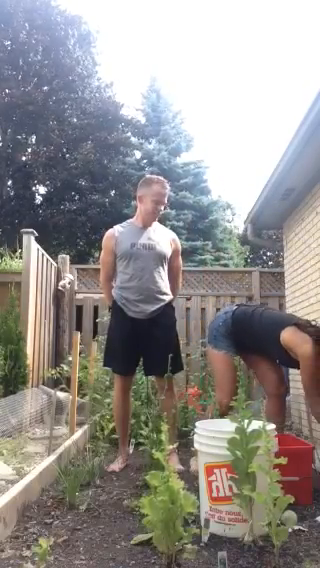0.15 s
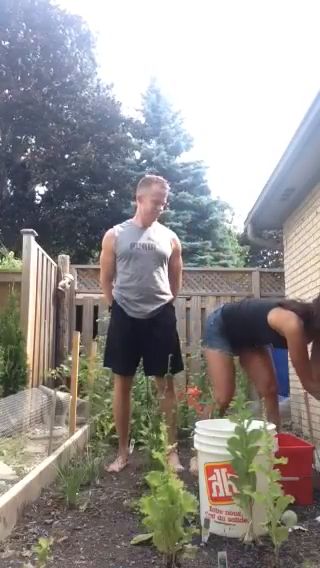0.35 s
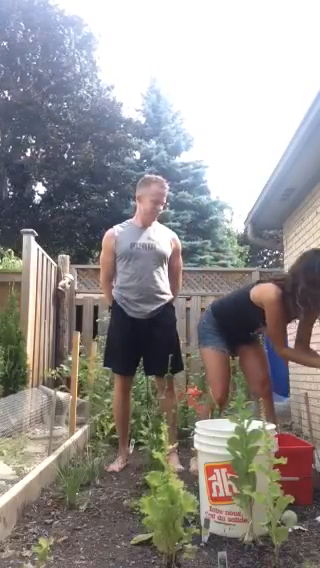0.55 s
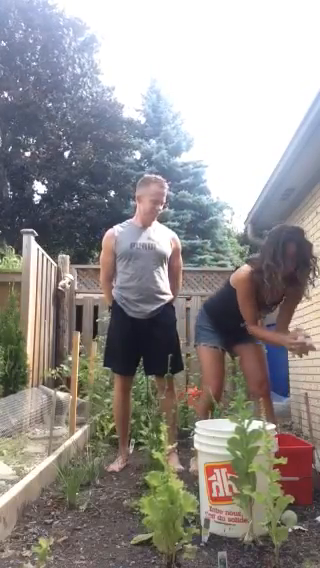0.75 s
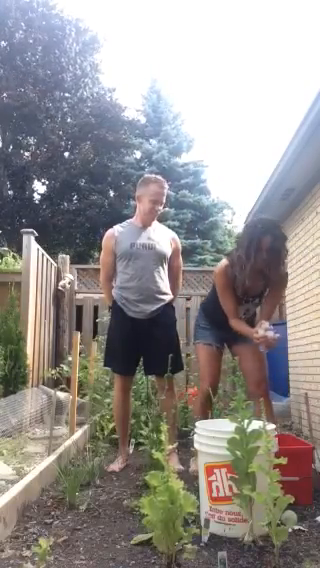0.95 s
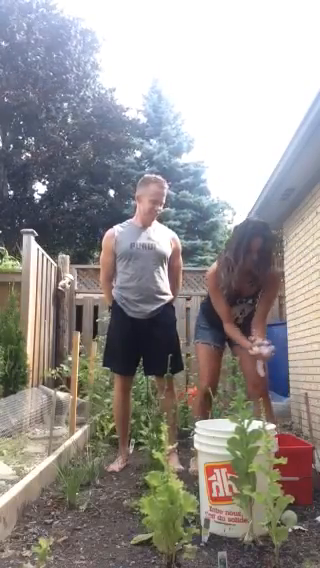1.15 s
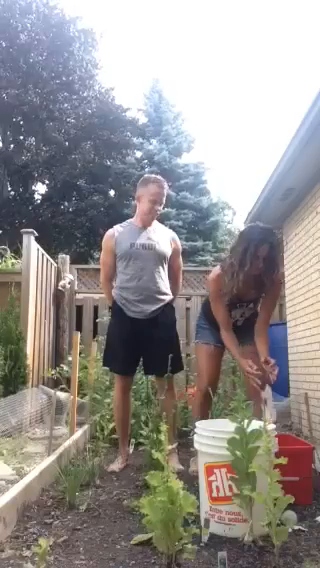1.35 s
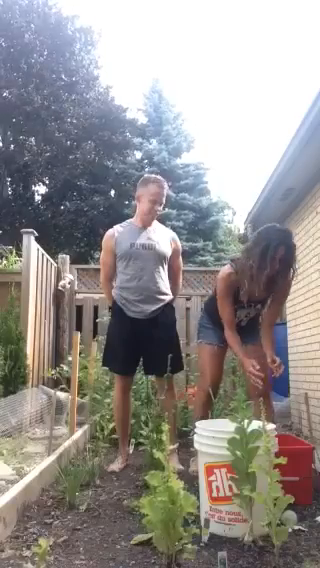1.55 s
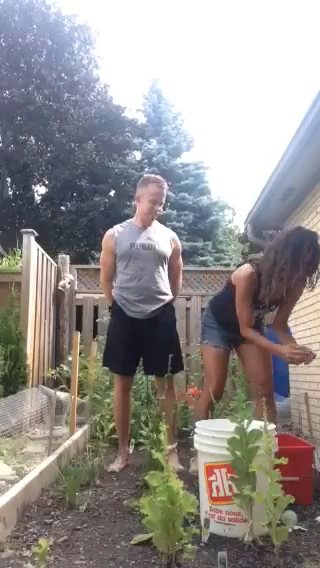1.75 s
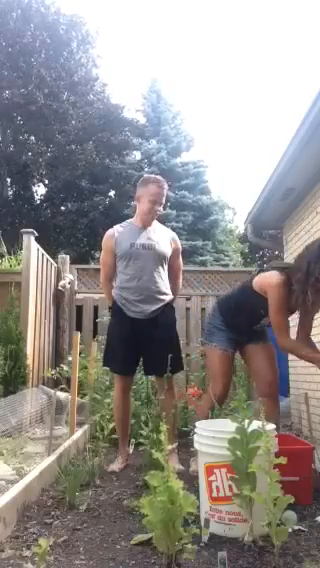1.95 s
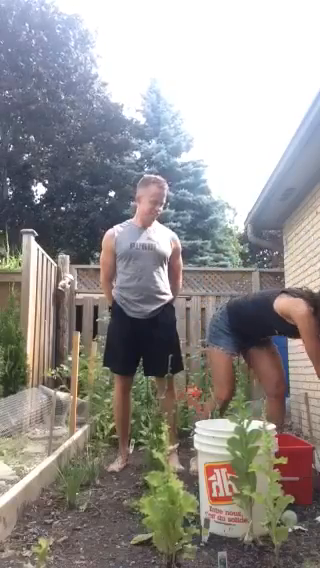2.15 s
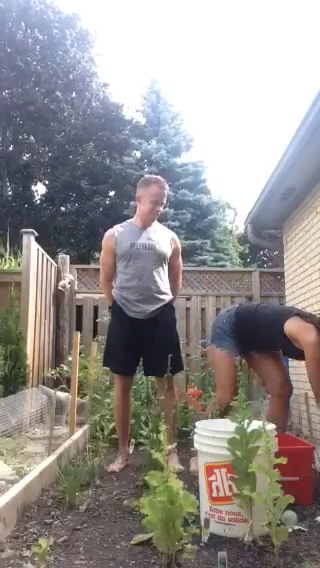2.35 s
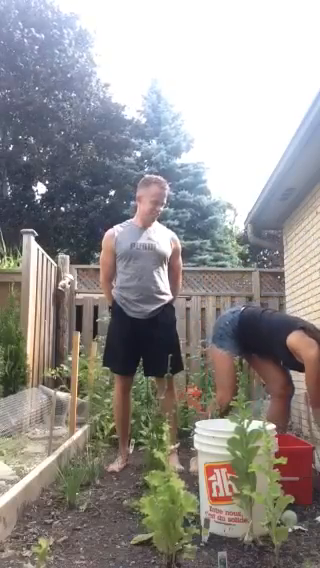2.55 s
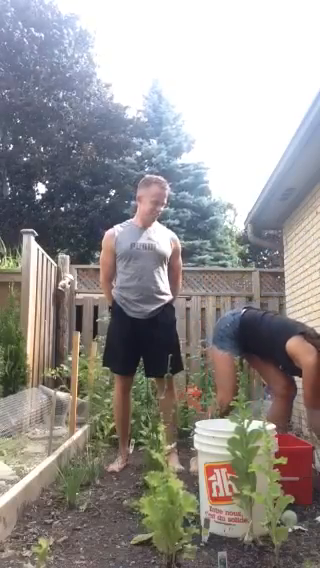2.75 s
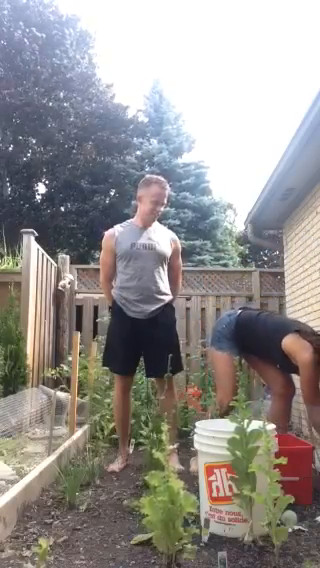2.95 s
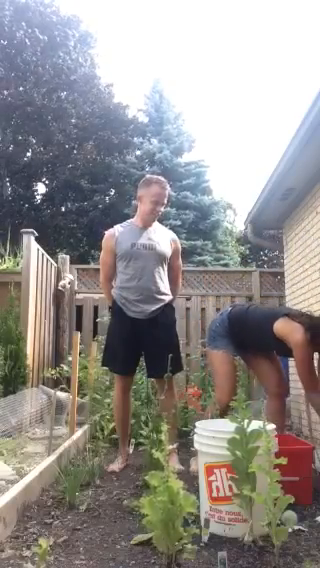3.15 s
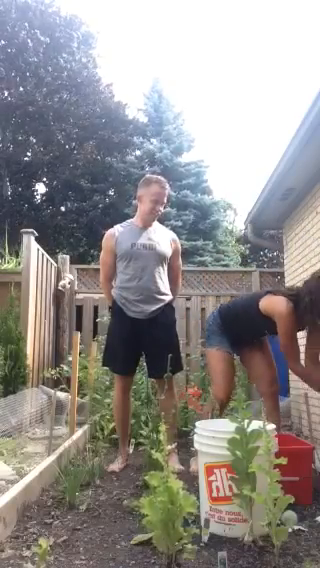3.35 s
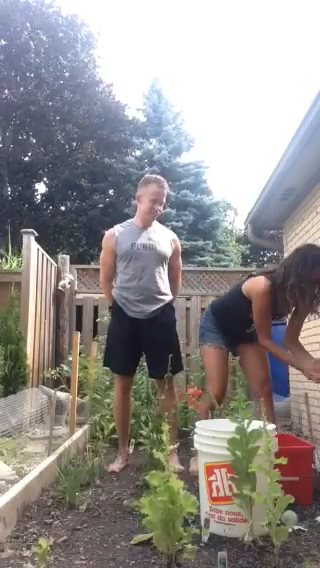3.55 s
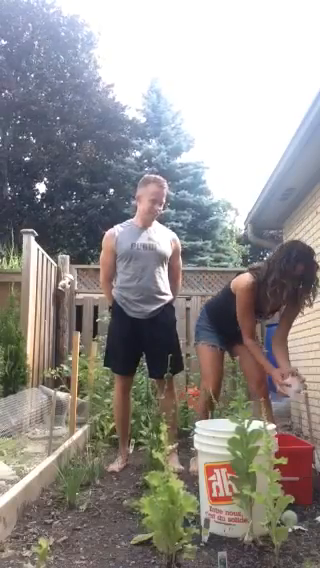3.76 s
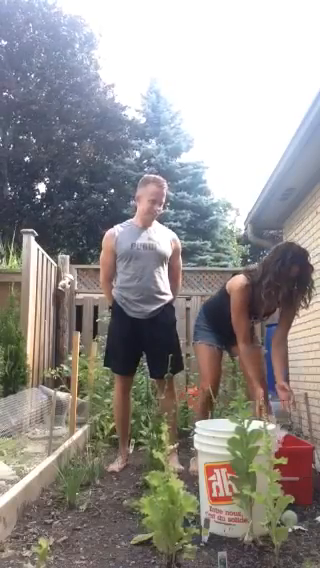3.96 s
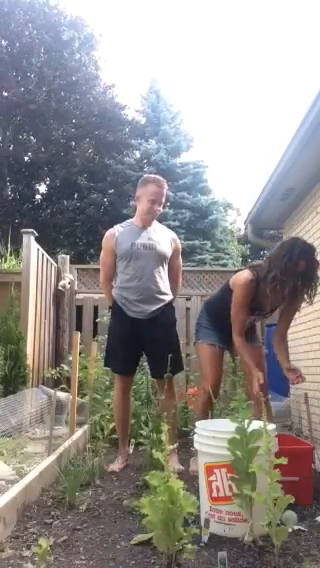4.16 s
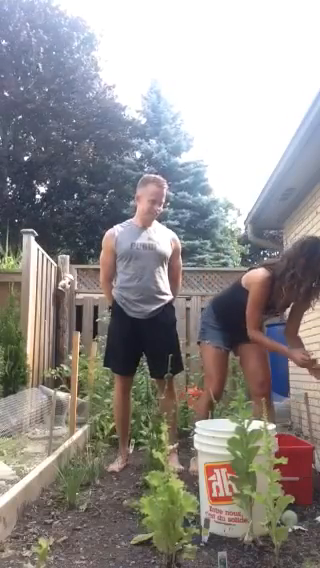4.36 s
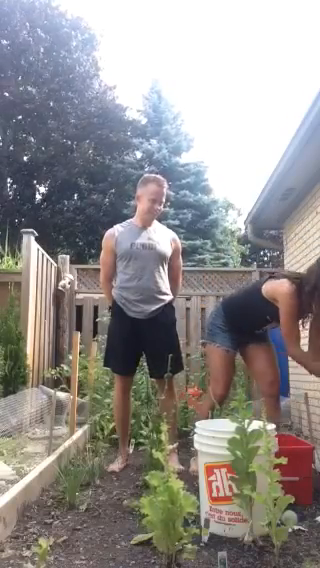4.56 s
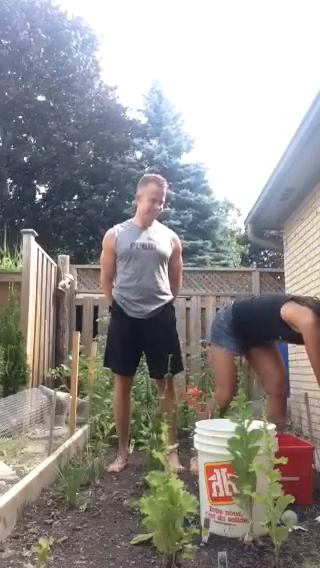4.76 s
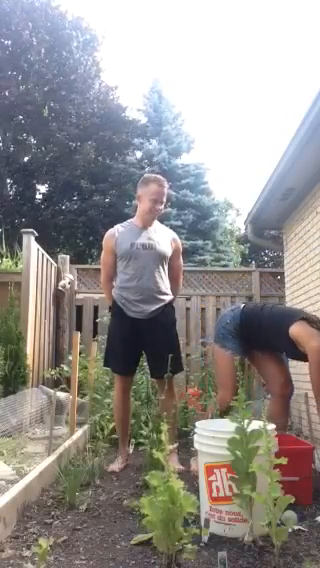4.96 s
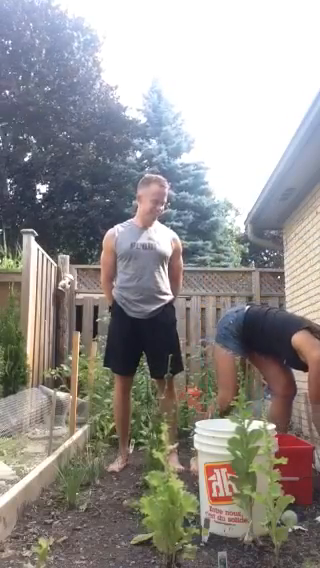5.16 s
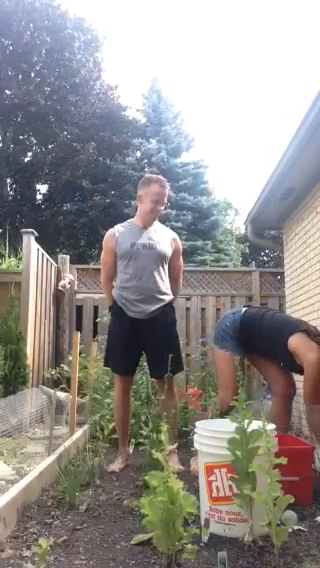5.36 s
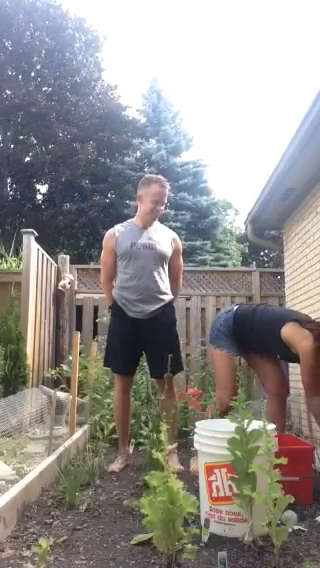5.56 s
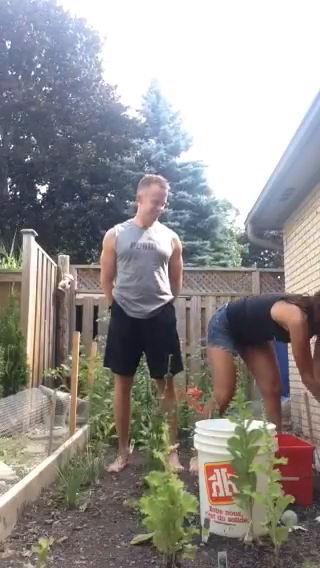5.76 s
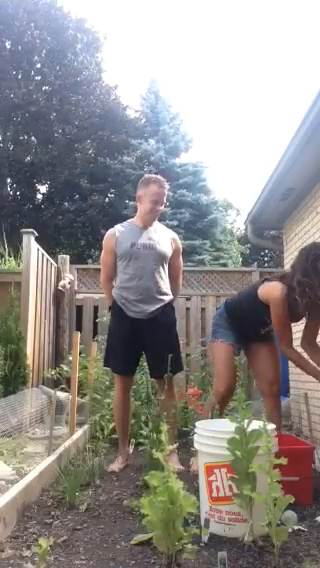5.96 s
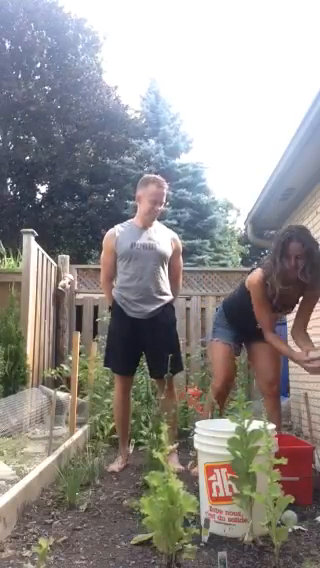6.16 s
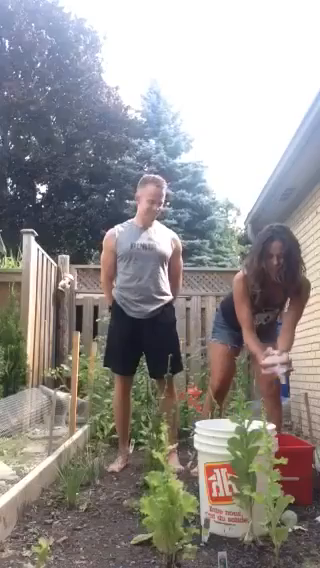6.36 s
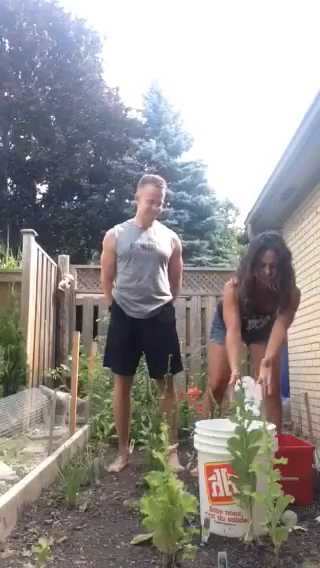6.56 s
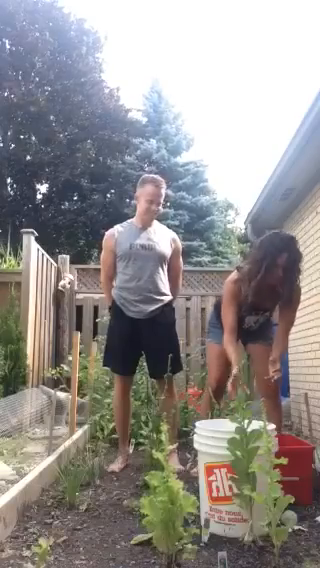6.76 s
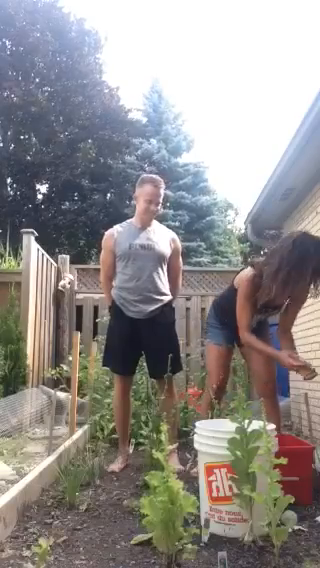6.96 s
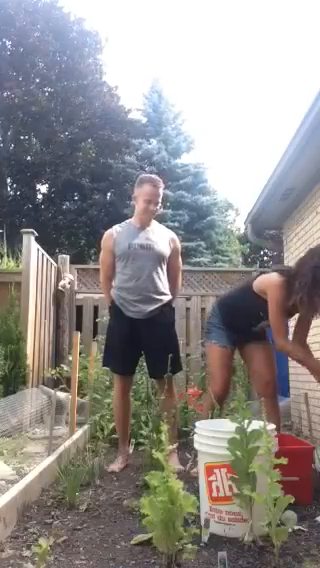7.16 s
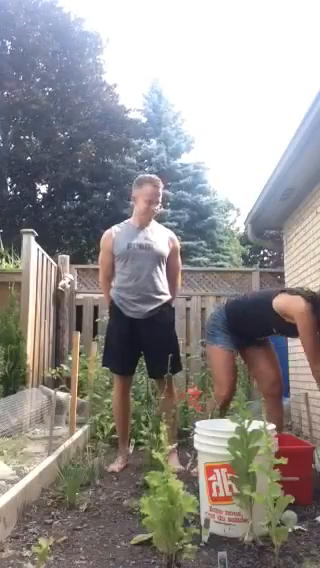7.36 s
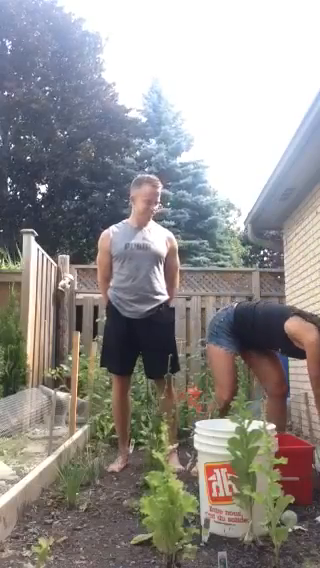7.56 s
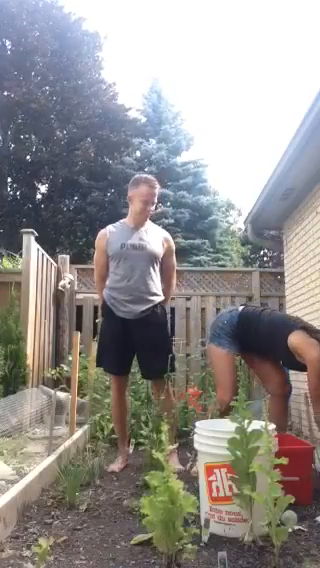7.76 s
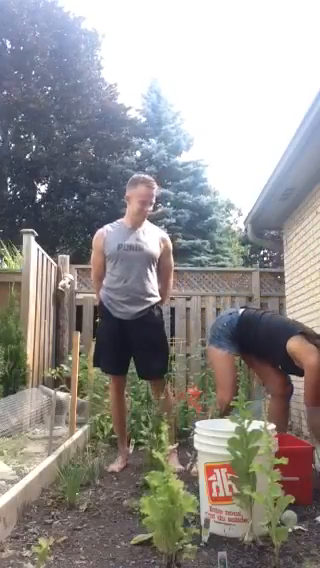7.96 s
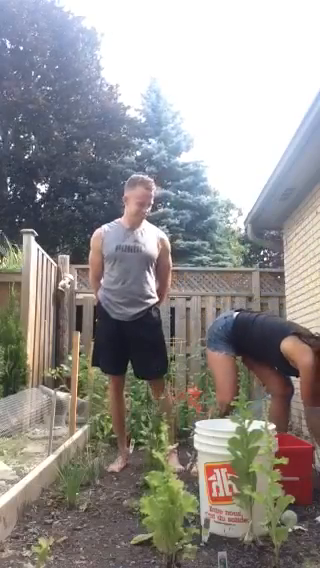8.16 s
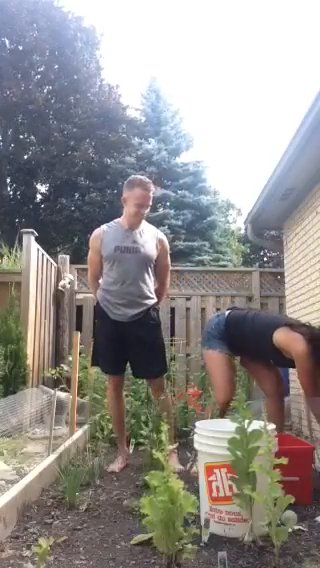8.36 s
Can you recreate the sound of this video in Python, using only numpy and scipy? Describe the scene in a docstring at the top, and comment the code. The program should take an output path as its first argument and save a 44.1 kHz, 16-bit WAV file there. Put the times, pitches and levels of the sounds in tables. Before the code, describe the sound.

Outdoors in a calm yard, ice rattles and grinds as it is scooped from a plastic box, with hard knocks over crisp crackle. Handfuls plop into a water bucket three times, the first loudest and deepest, the last with a ringing mid-pitched note. Low distant traffic, soft hiss and barely audible cricket chirps lie beneath. Close, slightly dull phone-like microphone with short reflections from wall and fence.

```python
"""In a garden, hands dig in a plastic cooler of ice cubes and drop handfuls into a bucket of water.
Cooler: random contacts ring hollow box modes and clinks; single knocks add beating box notes.
Bucket: cubes plunk and thump, short notes ring, water splashes and sloshes, the wall is hit.
Background: a narrow ring throbs as a cricket; coloured noise and two hums make traffic and hiss.
Fence and wall return dying noise-like echoes of the cooler and bucket."""
import sys
import numpy as np
from scipy import signal
from scipy.fft import rfft, irfft
from scipy.io import wavfile

SR = 44100
rng = np.random.default_rng(int(sys.argv[2]) if len(sys.argv) > 2 else 0)


def generate_wav(sig):
    """Save sig (samples, or channels by samples) to the path in sys.argv[1] as 16-bit PCM at SR."""
    pcm = np.round(np.clip(np.atleast_2d(sig).T, -1, 1) * 32767).astype(np.int16)
    wavfile.write(sys.argv[1], SR, pcm)


N = 374850
TIME_S = np.arange(N) / SR

# background noise spectrum: pitch_hz, density_db_per_hz
GARDEN_SPECTRUM = [(15, -40), (25, -9), (122, 4), (183, -1.5), (240, -2.5), (282, -3), (686, -2.5),
                   (898, -6), (1420, -14.5), (3100, -11.5), (13600, -19.5), (15600, -12.5)]
# background levels: time_s, traffic_rumble_db, background_hiss_db
AIR_LEVELS = [
    [(0, -58, -55), (.7, -63, -54), (2.3, -59.5, -53), (3, -57.5, -52), (3.5, -67, -52.5),
     (5, -63.5, -54.5), (6.1, -64.5, -54.5), (7, -64.5, -57), (8.5, -65, -53.5)],
]
# far engine drone against the rumble: pitch_hz, level_db, t60_s
DRONE_MODES = [(114, -15, 0.27), (239, -9.5, 0.37)]
# cricket: start_s, end_s, level_db
CRICKET_CHIRPS = [(3.79, 3.882, -63), (4.537, 4.654, -65.5), (6.15, 6.234, -65)]
# handfuls falling into the bucket: start_s, pour_s, splash_db, slosh_db
HANDFUL_POURS = [(1.481, .12, -47, -38), (4.082, 0.1, -46.5, -48), (6.762, 0.2, -53, -46.5)]
# cubes landing in the water: start_s, level_db
CUBE_PLUNKS = [(1.49, -12.5), (1.51, -18.5), (1.533, -29.5), (1.591, -20.5), (1.63, -25), (1.66, -27),
               (1.688, -25.5), (1.718, -46), (1.849, -39.5), (2.017, -41), (4.091, -26), (4.109, -23),
               (4.124, -21.5), (4.149, -19), (4.18, -21), (4.201, -26), (4.232, -30), (4.257, -27.5),
               (4.307, -40.5), (4.369, -47), (4.465, -44), (4.598, -38.5), (4.655, -42), (4.767, -41),
               (4.857, -40.5), (6.773, -30), (6.791, -22.5), (6.841, -22), (6.883, -29), (6.914, -16),
               (6.943, -29), (6.983, -34), (7.029, -41)]
# pitch of the bucket air, lowest in the last handful: time_s, pitch_hz
BUCKET_AIR_PITCH = [(1.5, 368), (4.1, 381.4), (4.9, 364), (6.77, 312), (6.92, 306), (7.03, 285)]
# short ringing notes at the bucket: start_s, level_db, pitch_hz
BUCKET_NOTES = [(1.57, -24.5, 1050), (1.59, -28, 1250), (1.63, -22.5, 1095), (1.895, -32.5, 1610),
                (4.141, -27.5, 590), (4.183, -20.5, 1870), (4.209, -30, 1300), (4.565, -33, 2600),
                (6.56, -37, 4000), (6.856, -7.5, 855), (6.86, -22, 1350), (6.889, -17.5, 797),
                (6.9, -31, 1120), (6.925, -36, 1240), (6.919, -19, 776), (6.969, -31, 810),
                (6.975, -48, 1260), (7.031, -32.5, 800), (7.124, -35, 804), (7.183, -40, 853)]
# splash spectrum: pitch_hz, density_db_per_hz
SPLASH_SPECTRUM = [(710, -30), (1200, -48), (1690, -24.5), (2190, -1.5), (2440, -1.5), (3510, -4.5),
                   (5510, -8), (12600, -13.5), (15600, -9)]
# sharp ticks at the bucket and drips on leaves: start_s, clack_db, fine_crackle_db
BUCKET_TICKS = [(1.4577, -48, -51), (1.486, -27, -35.5), (1.5908, -59, -49), (1.801, -50.5, -49.5),
                (3.829, -52, -46), (3.8727, -50.5, -47.5), (3.9, -52, -64), (4.095, -43, -46),
                (4.1814, -68, -42.5), (4.5264, -61, -52), (6.685, -49.5, -52), (6.764, -47, -51),
                (6.8114, -45, -41), (6.8553, -48, -50), (6.9196, -57, -74), (7.0344, -67, -63),
                (7.118, -59, -64), (7.3297, -73, -63)]
# bucket wall modes: pitch_hz, level_db, t60_s
WALL_MODES = [(2100, -6, 0.15), (2277, 2, 0.051), (2750, -11, 0.087), (3200, 1, 0.028), (3500, -6, 0.084)]
# cubes on the bucket wall: start_s, level_db
WALL_BLOWS = [(1.4895, -17), (4.1, -39), (4.125, -37), (4.14, -41), (4.195, -40), (6.857, -40), (6.89, -42),
              (6.922, -37)]
# dull thumps of heavy blows: start_s, level_db, pitch_hz
HEAVY_THUMPS = [(1.491, -33, 130), (3.348, -28.5, 186), (4.119, -45, 158), (6.841, -41, 105)]
# effort of the hands, one table a scoop: time_s, hollow_box_db
SCOOPS = [
    [(0.0, -30.5), (0.1, -42.5), (0.3, -48.5), (0.37, -49.5), (0.9, -68)],
    [(2.38, -40), (2.41, -32), (2.5, -32), (2.86, -28.5), (3.29, -39), (3.34, -47), (3.36, -36.5),
     (3.76, -61.5), (3.8, -65)],
    [(4.91, -66), (4.985, -47), (5.01, -30.5), (5.4, -34.5), (5.77, -33.5), (5.83, -43), (5.86, -34),
     (6.05, -56), (6.15, -65)],
    [(7.72, -46), (7.8, -33.5), (8.24, -34.5), (8.28, -29), (8.5, -45)],
]
# single knocks in the cooler: start_s, box_note_db, clink_db, box_note_hz
COOLER_KNOCKS = [(0.0982, -26.5, -37.5, 605), (0.122, -26.5, -45, 607), (0.186, -26.5, -44.5, 563),
                 (0.2096, -25.5, -58, 618), (0.315, -41, -54, 584), (0.3514, -34, -41.5, 619),
                 (0.3754, -28.5, -84, 593), (0.455, -45, -52.5, 603), (0.4806, -37.5, -48, 502),
                 (0.522, -40, -66, 980), (0.5366, -40, -59, 1050), (0.565, -40, -64, 690),
                 (0.595, -43, -62, 886), (0.7916, -45.5, -60, 600), (2.3954, -29.5, -37, 600),
                 (2.4294, -28.5, -50, 633), (2.577, -22.5, -33.5, 567), (2.6675, -27, -36.5, 582),
                 (2.7197, -27, -38, 600), (2.7792, -50, -42, 477), (2.8694, -26, -37, 587),
                 (2.8994, -27, -39, 590), (3.0144, -25.5, -44, 616), (3.062, -30.5, -46, 784),
                 (3.1273, -31, -54, 796), (3.1713, -27, -48, 906), (3.248, -26, -34, 730),
                 (3.348, -23, -28, 1042), (3.56, -41, -55, 600), (3.6026, -29, -43, 880),
                 (3.7209, -41, -51.5, 698), (3.735, -34, -56, 607), (4.9714, -40, -60, 670),
                 (4.9953, -27, -66, 540), (5.015, -51, -51, 600), (5.0907, -23, -40.5, 540),
                 (5.155, -33, -51, 600), (5.2284, -33, -47, 1050), (5.278, -27.5, -38.5, 576),
                 (5.2976, -25.5, -36, 457), (5.33, -32, -39, 640), (5.4344, -26, -52, 600),
                 (5.474, -24.5, -35.5, 636), (5.5495, -24.5, -39.5, 559), (5.6067, -22, -45, 580),
                 (5.634, -22.5, -32.5, 602), (5.7313, -25.5, -40.5, 550), (5.8498, -25.5, -32, 611),
                 (5.86, -27.5, -36, 794), (5.94, -38, -53, 628), (6.0174, -46.5, -76, 563),
                 (6.0716, -42, -45.5, 520), (7.5302, -40, -51, 872), (7.7244, -37, -45.5, 895),
                 (7.7712, -54, -45, 845), (7.7947, -31, -51, 584), (7.8386, -46, -41, 1050),
                 (7.8999, -37, -43, 550), (7.9544, -26, -40, 843), (8.048, -48, -43, 697),
                 (8.0827, -39, -46, 577), (8.1289, -39, -53, 630), (8.1983, -49, -42, 527),
                 (8.2582, -28, -39, 595), (8.2842, -29, -44.5, 604), (8.3403, -29.5, -56, 542),
                 (8.3694, -41, -45.5, 596), (8.408, -33, -40, 827), (8.4894, -32.5, -43.5, 610)]
# hollow cooler and its heap: pitch_hz, relative_db, t60_s
COOLER_MODES = [(412, -40, 0.15), (492.6, -1, 0.2), (541.5, 1.5, 0.039), (600, 6, 0.069), (679, -10, 0.27),
                (767, 0.5, 0.02), (848.5, 2.5, 0.042), (957, 0, 0.021), (1050, 3.5, 0.017),
                (1194, -13.5, 0.32)]
# clink spectrum, top lifted by the microphone: pitch_hz, density_db_per_hz
CLINK_SPECTRUM = [(710, -30), (1200, -6), (1360, -9), (1820, -2), (2740, -8), (3360, -8), (5870, -17),
                  (9720, -23.5), (14800, -28.5), (15600, -10)]
# extra fine crackle, mostly on knocks: start_s, level_db
EXTRA_CRACKLE = [(3.488, -47), (5.015, -41), (5.155, -44), (7.772, -52), (7.9, -52), (8.02, -45),
                 (8.083, -44), (8.37, -46), (8.395, -57)]

CUTOFF_HZ = 15720
YARD_T60_S, YARD_DB = 0.12, -16
RUMBLE_TOP_HZ = 190
CRICKET_HZ, CRICKET_PULSE_HZ = 4670, 44.3
RISE_S = 0.00057   # build-up of a knock
CRACKLE_HZ = 6000   # edge between clinks and fine crackle
POUR_RISE_S, SETTLE_DB_PER_S = 0.0028, 128   # the water calms after the last cube
BUCKET_LOW_HZ, COOLER_LOW_HZ = 175, 343
AIR_SCATTER, PLUNK_T60_S, THUMP_T60_S = 0.032, 0.13, 0.083
# water thrown up by each cube, against its plunk
PLUNK_SLOSH_DB, PLUNK_SPLASH_DB, WET_T60_S = -18, -33.5, 0.049
BUCKET_TICK_T60_S = 0.14
NOTE_CYCLES = 58.5   # until a bucket note has died by 60 dB
NOTE_SLOSH_DB, NOTE_SLOSH_T60_S = -23.5, 0.18   # slosh with each bucket note
POUR_AIR_DB = 0.5   # air in the bucket against the slosh
GRIND_DB = -8.5   # clink of grinding cubes against the hollow box
BOX_NOTE_T60_S, RATTLE_T60_S, CLINK_T60_S, FINE_T60_S = 0.12, 0.049, 0.16, 0.1
RATTLE_DB, FINE_DB = -4, -5.5   # rattle against the note, fine crackle against the clink
FINE_SLOPE = 0.27   # brighter hard knocks: extra crackle dB per clink dB above the mean


def from_db(db):
    """Decibels to gain."""
    return 10 ** (np.asarray(db) / 20)


def decay_per_sample(t60_s):
    """Gain per sample of a 60 dB decay in t60_s."""
    return from_db(-60 / (t60_s * SR))


def at_hz(spectrum, hz):
    """Spectrum in dB, interpolated over log frequency."""
    points_hz, points_db = np.transpose(spectrum)
    return np.interp(np.log(hz), np.log(points_hz), points_db)


def level(tables, column):
    """Gain from one dB column of several tables; silent outside them."""
    gain = np.zeros(N)
    for rows in tables:
        rows = np.array(rows)
        gain += from_db(np.interp(TIME_S, rows[:, 0], rows[:, column], -200, -200))
    return gain


def dying(starts_s, levels_db, t60_s):
    """Gain that rises fast at each start and decays exponentially."""
    kicks = np.zeros(N)
    np.add.at(kicks, np.round(np.asarray(starts_s) * SR).astype(int), from_db(levels_db))
    decay = signal.lfilter([1], [1, -decay_per_sample(t60_s)], kicks + 1e-18)
    keep = np.exp(-1 / (RISE_S * SR))   # the cubes of a heap do not all hit at once
    return signal.lfilter([1 - keep], [1, -keep], decay)


def contacts(per_s, spread_db):
    """Random contacts of uneven size and sign; rms 1."""
    sizes = from_db(spread_db * np.minimum(rng.exponential(1, N), 4))
    signs = rng.choice([-1, 1], N)
    clicks = sizes * signs * (rng.random(N) < per_s / SR)
    return clicks / clicks.std()


def ring(clicks, hz, t60_s):
    """Two-pole resonator: a unit click starts a dying sine of height about 1."""
    r, w = decay_per_sample(t60_s), 2 * np.pi * hz / SR
    return signal.lfilter([0, np.sin(w)], [1, -2 * r * np.cos(w), r * r], clicks + 1e-18)


def struck(gain, modes, per_s, spread_db, clump_db):
    """Modes struck by clumped contacts, a fresh shift per pair; steady gain 1 gives rms near 1."""
    clumps = np.interp(TIME_S, .018 * np.arange(500), rng.standard_normal(500))
    clicks = contacts(per_s, spread_db) * from_db(clump_db * clumps)
    clicks /= clicks.std()
    total = np.sqrt(sum(from_db(db) ** 2 for _, db, _ in modes))
    out = np.zeros(N)
    for k, (hz, db, t60_s) in enumerate(modes):
        if k % 2 == 0:
            blows = gain * np.roll(clicks, rng.integers(N))
        even = np.sqrt(4 * 3 * np.log(10) / (t60_s * SR))   # long rings gather more energy
        out += from_db(db) * even / total * ring(blows, hz, t60_s)
    return out


def small_modes(spectrum, cycles, count):
    """Short rings spread in log pitch, their strengths following a spectrum."""
    pitches_hz = np.geomspace(1250, 15500, count) * rng.uniform(.98, 1.02, count)
    # mode spacing grows with pitch, hence the 10 log10(hz)
    return [(hz, at_hz(spectrum, hz) + 10 * np.log10(hz), cycles / hz) for hz in pitches_hz]


def shards(grind, clink, crackle, modes, per_s, clump_db):
    """Clinks below the crackle edge, denser crackle above it; grind feeds both."""
    low = [m for m in modes if m[0] < CRACKLE_HZ]
    high = [m for m in modes if m[0] >= CRACKLE_HZ]
    high_power, power = [sum(from_db(m[1]) ** 2 for m in group) for group in (high, modes)]
    share = np.sqrt(high_power / power)
    clinks = struck(grind + clink, low, per_s, spread_db=-0.5, clump_db=clump_db)
    fine = struck(share * grind + crackle, high, 2.3 * per_s, spread_db=0.0, clump_db=clump_db)
    return clinks + fine


def tones(starts_s, levels_db, pitches_hz, t60_s, soft_s, beat):
    """Soft contacts start dying sines, each beating with a weaker neighbour mode."""
    out, t = np.zeros(N + SR), TIME_S[:SR // 3]
    count = len(starts_s)
    t60s_s, sides = np.broadcast_to(t60_s, count), rng.uniform(-0.97, 1, count)
    for start_s, db, hz, ring_s, side in zip(starts_s, levels_db, pitches_hz, t60s_s, sides):
        neighbour_hz = hz * (1 + beat * (side + np.sign(side)))
        pair = np.sin(2 * np.pi * hz * t) + 0.52 * np.sin(2 * np.pi * neighbour_hz * t)
        envelope = from_db(db - 60 * t / max(ring_s, .01)) * (1 - np.exp(-t / soft_s))
        i = round(start_s * SR)
        out[i:i + len(t)] += envelope * pair
    return out[:N]


def above(x, hz):
    """High-pass: small bodies radiate little bass."""
    return signal.sosfilt(signal.butter(4, hz, "high", fs=SR, output="sos"), x)


def garden():
    """Coloured noise split into traffic rumble and hiss; resonated noise adds the drone."""
    hz = np.maximum(np.fft.rfftfreq(N, 1 / SR), 1)
    colour = rfft(rng.standard_normal(N)) * from_db(at_hz(GARDEN_SPECTRUM, hz))
    low = 1 / (1 + (hz / RUMBLE_TOP_HZ) ** 4)
    rumble, hiss = irfft(colour * low, N), irfft(colour * (1 - low), N)
    rumble /= rumble.std()
    hiss /= hiss.std()
    white = rng.standard_normal(N)
    for drone_hz, db, t60_s in DRONE_MODES:
        hum = ring(white, drone_hz, t60_s)
        rumble += from_db(db) * hum / hum.std()
    return level(AIR_LEVELS, column=1) * rumble + level(AIR_LEVELS, column=2) * hiss


def yard(x):
    """Scattered echoes from fence and wall: dying noise that starts after 6 ms."""
    t = TIME_S[:SR // 2]
    echoes = rng.standard_normal(len(t)) * from_db(-60 * t / YARD_T60_S) * (t > .006)
    echoes = signal.lfilter([1], [1, -.3], echoes)   # rough wood dulls the echoes
    return signal.fftconvolve(x, echoes / np.sqrt(np.sum(echoes ** 2)))[:N]


def cricket():
    """A narrow, wavering high ring throbbing in short chirps."""
    on = sum(from_db(db) * ((TIME_S > a) & (TIME_S < b)) for a, b, db in CRICKET_CHIRPS)
    rasp = ring(rng.standard_normal(N), CRICKET_HZ, 0.027)
    throb = 0.69 + np.sin(np.pi * CRICKET_PULSE_HZ * TIME_S) ** 2
    return on * throb * rasp / rasp.std()


def thumps():
    """Heavy blows as short low tones with a soft onset."""
    return tones(*np.transpose(HEAVY_THUMPS), THUMP_T60_S, soft_s=0.004, beat=0.11)


def pouring(column):
    """Gain of each handful: fast rise, hold while cubes fall, then calming."""
    gain = np.zeros(N)
    for handful in HANDFUL_POURS:
        since_s = TIME_S - handful[0]
        calming_s = np.maximum(since_s - handful[1], 0)
        rise = np.clip(since_s / POUR_RISE_S, 0, 1)
        gain += rise * from_db(handful[column] - SETTLE_DB_PER_S * calming_s)
    return gain


def splash(thrown):
    """Thrown water and sharp ticks as dense showers of short rings."""
    s, clack_db, fine_db = np.transpose(BUCKET_TICKS)
    clack, crackle = dying(s, clack_db, BUCKET_TICK_T60_S), dying(s, fine_db, BUCKET_TICK_T60_S)
    wash = pouring(column=2) + from_db(PLUNK_SPLASH_DB) * thrown
    modes = small_modes(SPLASH_SPECTRUM, cycles=50, count=32)
    return shards(wash, clack, crackle, modes, per_s=800, clump_db=4.0)


def slosh(thrown):
    """Moving water as random contacts on short mid-pitched rings."""
    s, db, _ = np.transpose(BUCKET_NOTES)
    with_notes = dying(s, db + NOTE_SLOSH_DB, NOTE_SLOSH_T60_S)
    gain = pouring(column=3) + from_db(PLUNK_SLOSH_DB) * thrown + with_notes
    lumps = [(hz, 0, 22 / hz) for hz in np.geomspace(450, 1900, 14)]
    return struck(gain, lumps, per_s=530, spread_db=0.5, clump_db=2.5)


def plunks():
    """Each landing cube rings the bucket air; pouring shakes its low modes."""
    s, db = np.transpose(CUBE_PLUNKS)
    scatter = 1 + AIR_SCATTER * rng.uniform(-0.91, 1, len(s))
    air_hz = np.interp(s, *np.transpose(BUCKET_AIR_PITCH)) * scatter
    hollow = [(hz, 0, .09) for hz in (291, 349.5, 377, 425)]
    shaken = from_db(POUR_AIR_DB) * pouring(column=3)
    rumble = struck(shaken, hollow, per_s=150, spread_db=4.0, clump_db=2.0)
    return rumble + tones(s, db, air_hz, PLUNK_T60_S, soft_s=0.0067, beat=0.044)


def bucket_notes():
    """Short notes, each dying over a fixed number of cycles."""
    s, db, hz = np.transpose(BUCKET_NOTES)
    return tones(s, db, hz, NOTE_CYCLES / hz, soft_s=0.0057, beat=0.039)


def bucket_wall():
    """Single clicks ring the modes of the wall."""
    blows = np.zeros(N)
    for s, db in WALL_BLOWS:
        blows[round(s * SR)] += from_db(db)
    return sum(from_db(db) * ring(blows, hz, t60_s) for hz, db, t60_s in WALL_MODES)


def bucket():
    """Plunks, ringing notes, splash, slosh and wall hits; bass cut."""
    thrown = dying(*np.transpose(CUBE_PLUNKS), WET_T60_S)
    water = plunks() + splash(thrown) + slosh(thrown)
    return above(water + bucket_notes() + bucket_wall(), BUCKET_LOW_HZ)


def jolts(per_s, size, t60_s):
    """Small random shifts of the heap: a gain that jumps up and settles; rms 1."""
    kicks = rng.random(N) * (rng.random(N) < per_s / SR)
    lift = 1 + size * signal.lfilter([1], [1, -decay_per_sample(t60_s)], kicks)
    return lift / np.sqrt(np.mean(lift ** 2))


def cooler():
    """Grinding cubes and knocks; each knock is a dying shower of contacts plus one box note."""
    shifts, effort = jolts(per_s=140, size=.45, t60_s=0.028), level(SCOOPS, column=1)
    s, note_db, clink_db, note_hz = np.transpose(COOLER_KNOCKS)
    hollow = np.sqrt(shifts) * effort + dying(s, note_db + RATTLE_DB, RATTLE_T60_S)
    box = struck(hollow, COOLER_MODES, per_s=270, spread_db=2.5, clump_db=0.5)
    notes = tones(s, note_db, note_hz, BOX_NOTE_T60_S, soft_s=0.00061, beat=0.0525)
    clink = dying(s, clink_db, CLINK_T60_S)
    fine_db = clink_db + FINE_DB + FINE_SLOPE * (clink_db - clink_db.mean())
    crackle = dying(s, fine_db, FINE_T60_S) + dying(*np.transpose(EXTRA_CRACKLE), FINE_T60_S)
    grind = from_db(GRIND_DB) * shifts * effort
    modes = small_modes(CLINK_SPECTRUM, cycles=34.0, count=40)
    clinks = shards(grind, clink, crackle, modes, per_s=490, clump_db=3.0)
    return above(box + notes + clinks, COOLER_LOW_HZ)


def scene():
    """All sources at one microphone."""
    near = thumps() + bucket() + cooler()
    return (garden() + cricket() + from_db(YARD_DB) * yard(near) + near)[None]


def record(dry):
    """Steep low-pass cuts the top."""
    return signal.sosfilt(signal.cheby2(20, 80, CUTOFF_HZ, fs=SR, output="sos"), dry)


dry = scene()
out = record(dry)
generate_wav(out)
```